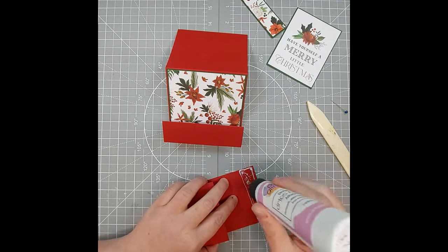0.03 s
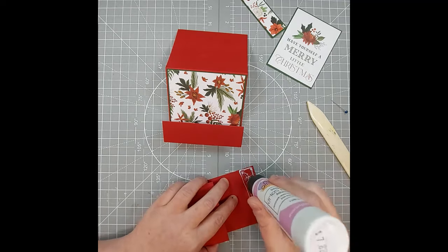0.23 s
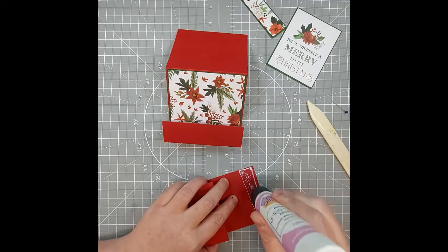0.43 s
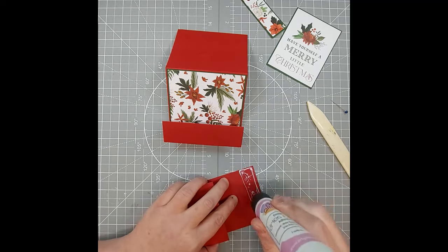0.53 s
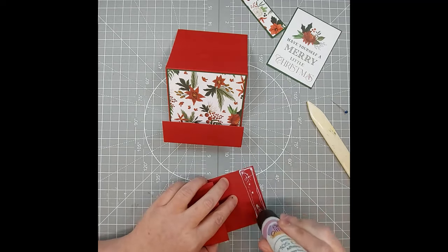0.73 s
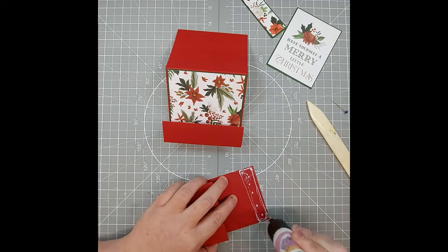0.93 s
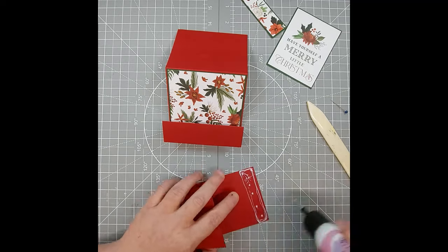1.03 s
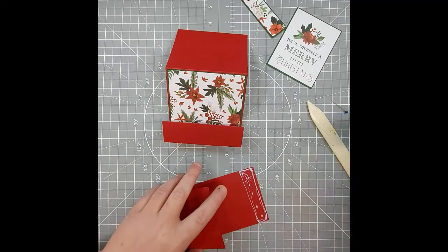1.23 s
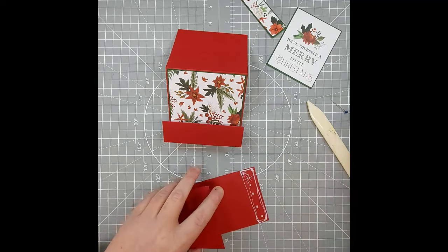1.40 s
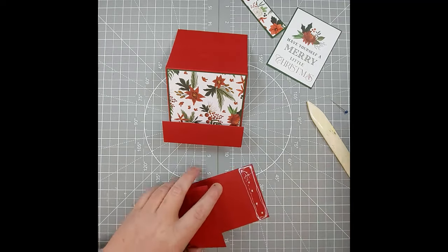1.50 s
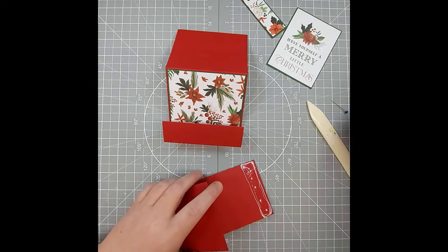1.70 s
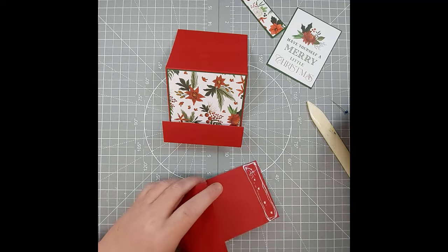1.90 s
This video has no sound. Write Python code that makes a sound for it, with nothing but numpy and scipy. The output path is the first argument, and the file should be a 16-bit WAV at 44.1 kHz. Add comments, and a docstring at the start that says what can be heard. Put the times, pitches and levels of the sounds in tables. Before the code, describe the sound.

A plastic glue bottle is dabbed on card on a table, making five dull thumps between 0.2 and 0.9 seconds, the last the loudest. The nozzle ticks as it lifts at about 1 second, and the card rustles faintly. A soft finger thump and light knock come around 1.4 seconds, then a hand slides faintly over the card until about 1.9 seconds. Quiet room hiss and hum lie underneath.

```python
"""In a small room, a plastic glue bottle is dabbed five times on a piece of card on a craft table.
Each dab excites the damped modes of the table top, the bottle and the room: a thump and a ring.
The nozzle ticks as it comes off the sticky card. The card rustles by stick-slip friction, a soft finger
thump and a light knock follow, and a hand slides faintly over the card, above a quiet hiss and hum."""
import sys
import numpy as np
from scipy import signal
from scipy.fft import rfft, irfft
from scipy.io import wavfile

SR = 44100
rng = np.random.default_rng(int(sys.argv[2]) if len(sys.argv) > 2 else 0)


def transcribe(u):
    """Save the signal u as a 16-bit wav file named by the first command-line argument.

    u: samples, shape (n,) or (channels, n), limited to [-1, 1]; the rate is SR.
    q: integer samples, one column per channel.
    """
    v = np.clip(np.atleast_2d(u).T, -1, 1)
    q = np.round(v * 32767).astype(np.int16)
    wavfile.write(sys.argv[1], SR, q)


N = 85995
TIME = np.arange(N) / SR
RING_TIME = TIME[:int(.6 * SR)]


def from_db(db):
    """Amplitude grows tenfold for every 20 dB."""
    return 10 ** (np.asarray(db) / 20)


def envelope(points):
    """Gain over time, linear in decibels between (time_s, level_db) points."""
    return from_db(np.interp(TIME, *np.transpose(points)))


def unit_power(x):
    """Division by the RMS value gives a mean power of one."""
    return x / np.sqrt(np.mean(x ** 2) + 1e-20)


def butter(x, hz, kind, order=2):
    """A causal Butterworth filter, maximally flat in its passband."""
    return signal.sosfilt(signal.butter(order, hz, kind, fs=SR, output="sos"), x)


def in_band(x, low_hz, high_hz):
    """Noise power is proportional to bandwidth: this band-pass is scaled so white noise keeps its power."""
    return butter(x, (low_hz, high_hz), "band", order=3) * np.sqrt(SR / 2 / (high_hz - low_hz))


def stereo_noise(correlation, size=N):
    """The balance of independent mid and side noise sets the correlation of left and right."""
    mid, side = rng.standard_normal((2, size))
    return np.sqrt((1 + correlation) / 2) * mid + np.sqrt((1 - correlation) / 2) * np.array([side, -side])


def colour(x, spectrum):
    """Spectral shaping by (frequency_hz, gain_db) points, normalised to unit power."""
    hz, db = np.transpose(spectrum)
    log_hz = np.log(np.fft.rfftfreq(N, 1 / SR) + 1)
    gain = from_db(np.interp(log_hz, np.log(hz), db))
    return unit_power(irfft(rfft(x) * gain, N))


def decay(t60_s):
    """Damping makes amplitude fall exponentially, by 60 dB in t60_s."""
    return np.exp(-np.log(1000) * RING_TIME / t60_s)


def mode(hz, db, t60_s):
    """A struck mode vibrates freely as a damped sinusoid."""
    return from_db(db) * decay(t60_s) * np.sin(2 * np.pi * hz * RING_TIME)


def dense_modes(t60_s, correlation):
    """Many overlapping modes sum to decaying noise."""
    return stereo_noise(correlation, size=len(RING_TIME)) * decay(t60_s)


def contact(low_hz, high_hz, t60_s, room_db, room_t60_s, click_db):
    """The impulse response of a contact in one band: a click, brief ringing and a diffuse room tail."""
    response = dense_modes(t60_s, correlation=0.1)
    response += from_db(room_db) * dense_modes(room_t60_s, correlation=0.02)
    response[:, 0] += from_db(click_db) * np.sqrt(SR / 2 / (high_hz - low_hz))
    return in_band(response, low_hz, high_hz)


def add(out, start_s, sound):
    """Superposition: a sound adds to the mix from start_s on."""
    part = out[:, int(start_s * SR):][:, :sound.shape[-1]]
    part += sound[..., :part.shape[-1]]


def room_tone():
    """Broadband noise (partly correlated rumble, uncorrelated hiss) lies under mains hum and a drone."""
    # Colouring of the room noise: frequency_hz, gain_db
    noise_spectrum = [(25, -17.5), (60, -5.5), (100, -6), (160, -16.5), (300, -15), (550, -23),
                      (1000, -30.5), (2000, -31), (5000, -39), (8000, -35), (11500, -28.5), (14500, -33),
                      (16000, -37)]
    # Mains hum: pitch_hz, rms_db
    hum_tones = [(59.3, -67)]
    # A low drone that sets in with the tapping: time_s, rms_db
    drone_levels = [(0.2, -90), (0.35, -66.5), (1.05, -52.5), (1.301, -65.5), (1.65, -57.5), (1.95, -77.5)]
    noise_db, drone_hz = -73, 92.6
    rumble = butter(stereo_noise(correlation=0.3), 300, "low")
    hiss = butter(stereo_noise(correlation=0), 500, "high")
    hum = sum(from_db(db) * np.sin(2 * np.pi * hz * TIME) for hz, db in hum_tones)
    drone = envelope(drone_levels) * np.sin(2 * np.pi * drone_hz * TIME)
    return from_db(noise_db) * colour(rumble + hiss, noise_spectrum) + np.sqrt(2) * (hum + drone)


def hand_presses():
    """A hand leans on the table: a smooth force excites only low frequencies, a bump with no attack."""
    # Gaussian pulses of pressure: centre_s, level_db, sigma_s
    presses = [(0.217, -49.5, 0.0032), (1.345, -47.5, 0.018), (1.403, -53.5, 0.021), (1.66, -64.5, 0.063)]
    weight = sum(from_db(db) * np.exp(-.5 * ((TIME - centre_s) / sigma_s) ** 2)
                 for centre_s, db, sigma_s in presses)
    return weight * unit_power(butter(rng.standard_normal(N), hz=(35.6, 148.7), kind="band", order=4))


def friction(spectrum, levels):
    """Stick-slip friction: paper fibres catch and let go, giving fine grains over a smooth hiss."""
    grains_per_s, spread_db, grain_share = 1500, 2, 0.35
    sizes = from_db(spread_db * np.minimum(rng.exponential(1, N), 4))
    grains = unit_power(sizes * (rng.random(N) < grains_per_s / SR))
    slips = stereo_noise(correlation=0.055) * np.sqrt(1 - grain_share + grain_share * grains ** 2)
    started = TIME > levels[0][0]
    return colour(slips, spectrum) * envelope(levels) * started


def card_rubbing():
    """Friction noise: the card rustles, the hand slides over it, and it scrapes briefly as it shifts."""
    # Colouring of each kind of rubbing: frequency_hz, gain_db
    rustle_spectrum = [(500, -4.5), (1000, -8), (1550, 2.5), (2100, -5.5), (2700, -0.5), (3100, -11),
                       (3600, -1.5), (5000, -9), (6700, -6), (9500, -9), (15000, -13)]
    slide_spectrum = [(500, -16), (800, -13.5), (1020, 2), (1500, -8.5), (2200, -1.5), (2700, -6.5),
                      (3500, 2.5), (5000, -9), (9000, -16)]
    scrape_spectrum = [(600, -33), (1020, -9.5), (1500, -37), (2230, 1.5), (2700, -9.5), (8000, -21.5)]
    # Course of each movement: time_s, level_db
    rustle_levels = [(0.93, -73), (0.992, -63.5), (1.026, -60.5), (1.06, -55), (1.079, -62.5),
                     (1.125, -72.5), (1.299, -74), (1.338, -66.5), (1.4, -75.5), (1.52, -67), (1.62, -84),
                     (1.95, -92)]
    slide_levels = [(1.38, -96), (1.44, -71), (1.54, -69), (1.68, -71), (1.832, -71.5), (1.891, -82.5),
                    (1.95, -72.5)]
    scrape_levels = [(1.73, -86), (1.79, -78), (1.834, -67.5), (1.88, -82.5), (1.95, -74)]
    return (friction(rustle_spectrum, rustle_levels) + friction(slide_spectrum, slide_levels)
            + friction(scrape_spectrum, scrape_levels))


def sticky_ticks():
    """Sudden release of stress radiates tiny bright transients as glue lets go and the card flexes."""
    # Ticks of nozzle and card: start_s, low_band_db, high_band_db, t60_s
    ticks = [(0.447, -68, -57.5, 0.018), (0.6126, -70.5, -68, .025), (0.789, -68.5, -59.5, 0.083),
             (0.9590, -53, -46.5, 0.028), (1.0962, -63, -66, 0.034), (1.1764, -68.5, -66, 0.054),
             (1.322, -60, -65, 0.04), (1.6682, -69, -67.5, 0.031), (1.749, -63, -68.5, 0.084)]
    low_band_hz, high_band_hz = (2700, 7100), (8800, 13800)
    out = np.zeros((2, N))
    for start_s, low_db, high_db, t60_s in ticks:
        for db, band_hz in ((low_db, low_band_hz), (high_db, high_band_hz)):
            tick = contact(*band_hz, t60_s, room_db=-17.5, room_t60_s=0.13, click_db=-3.5)
            add(out, start_s, from_db(db) * tick)
    return out


def table_thump():
    """Modal response of the table top, low-passed by a soft mat; returns the lower and upper modes."""
    # Modes of the table top: pitch_hz, level_db, t60_s, polarity
    table_modes = [(74.3, -5, .13, -1), (85.6, -0.33, 0.099, 1), (110.9, -9.5, 0.21, 1),
                   (124.5, -12, 0.19, 1), (149.2, -2.4, 0.081, -1), (149.5, -17, 0.32, -1),
                   (229.9, -13.5, 0.22, -1), (273.4, -7.5, 0.087, -1), (293.9, -12, 0.16, 1),
                   (319.3, -14, 0.13, 1), (362.5, -24.5, 0.21, 1)]
    split_hz, contact_hz, low_cut_hz = 200, 1580, 51.5
    lower = sum(sign * mode(hz, db, t60_s) for hz, db, t60_s, sign in table_modes if hz < split_hz)
    upper = sum(sign * mode(hz, db, t60_s) for hz, db, t60_s, sign in table_modes if hz >= split_hz)
    cushioned = butter(np.array([lower, upper]), contact_hz, "low")
    return butter(cushioned, low_cut_hz, "high")


def table_taps():
    """Impact excitation: bottle dabs, then a soft finger thump and a light knock on the table."""
    # Blows on the table: start_s, thump_db, knock_db, ring_db, clack_db, snap_db, tick_db, pan_db
    blows = [(0.2240, -24, -48, -49.5, -62, -74.5, -61.5, 1.5),
             (0.4107, -17, -45.5, -44.5, -59.5, -71, -55, 3),
             (0.5836, -14.5, -41.5, -46, -64, -73, -53, 2.5),
             (0.7540, -16.5, -54.5, -49.5, -66.5, -73, -57, 2.5),
             (0.7830, -44, -62, -61.5, -66, -72.5, -72, -5),
             (0.9041, -11, -42, -44, -47.5, -56.5, -48, 3.5),
             (1.428, -43.5, -68, -74, -68.5, -79, -77.5, 7.5),
             (1.4540, -24.5, -51.5, -51.5, -60, -75, -62.5, -3)]
    # Midrange ring, in the dabs that of the bottle: pitch_hz, level_db, t60_s
    ring_modes = [(511, -12, 0.36), (561, -8, 0.075), (631.8, -18.5, 0.085), (707.5, -9, .14),
                  (774.7, -9.5, 0.17), (858.5, -12, 0.24), (924.3, -9.5, 0.15), (1343, -24.5, 0.29),
                  (1530, -23, .17), (1720, -25, 0.2)]
    # Bands of contact noise, dull to bright: low_hz, high_hz, t60_s, room_db, room_t60_s
    knock = (371, 639, 0.1, -3, .17)
    clack = (950, 2150, .03, -2, .2)
    snap = (2398, 4599.5, 0.1, -5, 0.04)
    tick = (8300, 13000, .004, -31, .15)
    lower, upper = table_thump()
    ring = np.array([(-1) ** k * mode(*row) for k, row in enumerate(ring_modes)])
    room_boom = from_db(-27.5) * in_band(dense_modes(t60_s=0.58, correlation=0.52), low_hz=63, high_hz=282)
    out = np.zeros((2, N))
    for start_s, thump_db, knock_db, ring_db, clack_db, snap_db, tick_db, pan_db in blows:
        pan = from_db([[pan_db / 2], [-pan_db / 2]])   # the upper modes reach left and right unequally
        add(out, start_s, from_db(thump_db) * (lower + upper * pan + room_boom))
        scatter_db = 3 * rng.standard_normal((2, len(ring)))   # per side and mode
        add(out, start_s, from_db(ring_db + scatter_db) @ ring)
        for db, band in ((knock_db, knock), (clack_db, clack), (snap_db, snap), (tick_db, tick)):
            add(out, start_s, from_db(db) * contact(*band, click_db=5))
    return out


def scene():
    """The pressures of taps, ticks, handling and room tone add linearly."""
    card = card_rubbing()
    return table_taps() + sticky_ticks() + hand_presses() + card + room_tone()


def record(dry):
    """Band limiting: a steep elliptic low-pass removes the treble above 16 kHz."""
    return signal.sosfilt(signal.ellip(10, .1, 80, 16000, fs=SR, output="sos"), dry)


dry = scene()
out = record(dry)
transcribe(out)
```